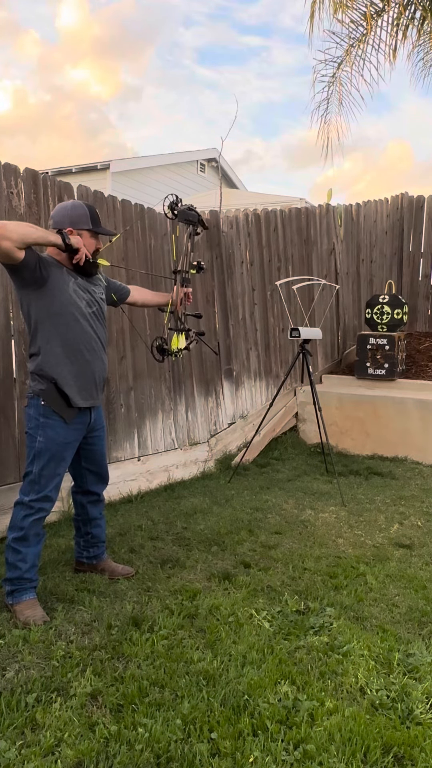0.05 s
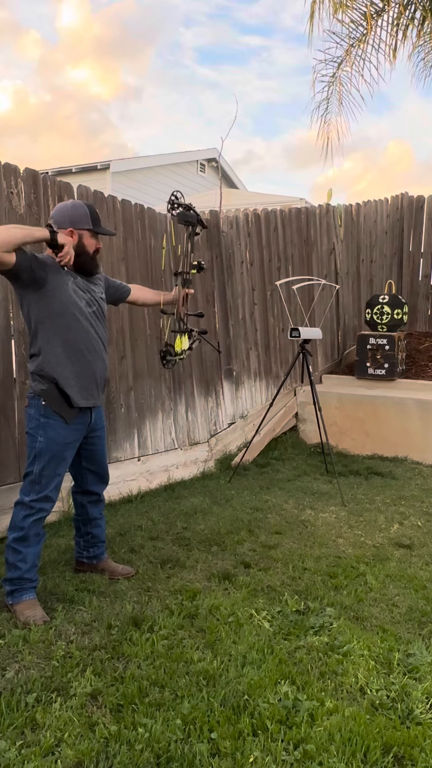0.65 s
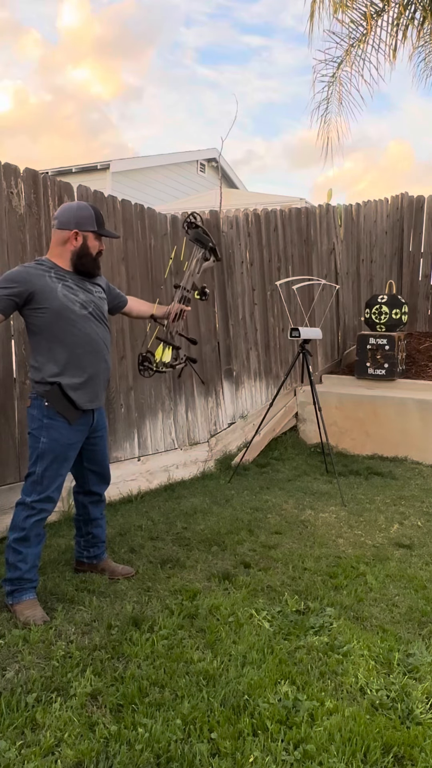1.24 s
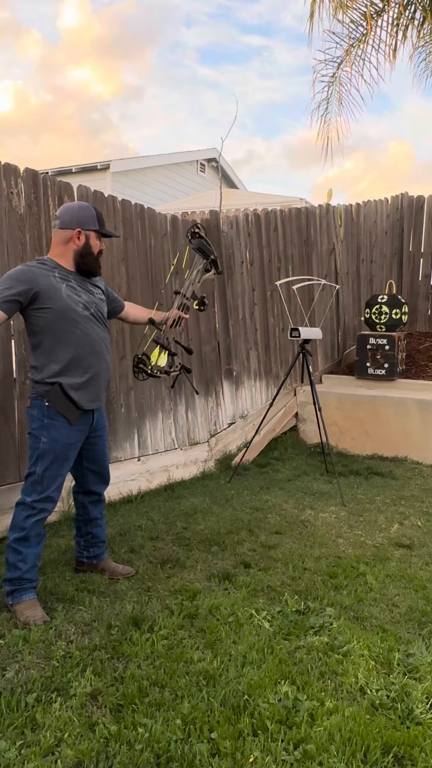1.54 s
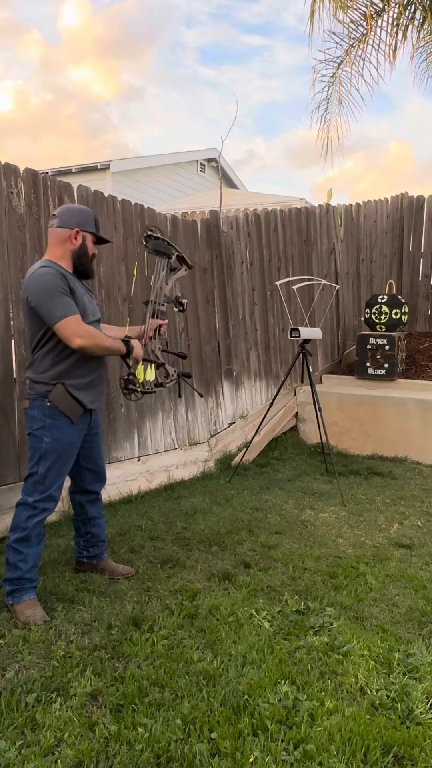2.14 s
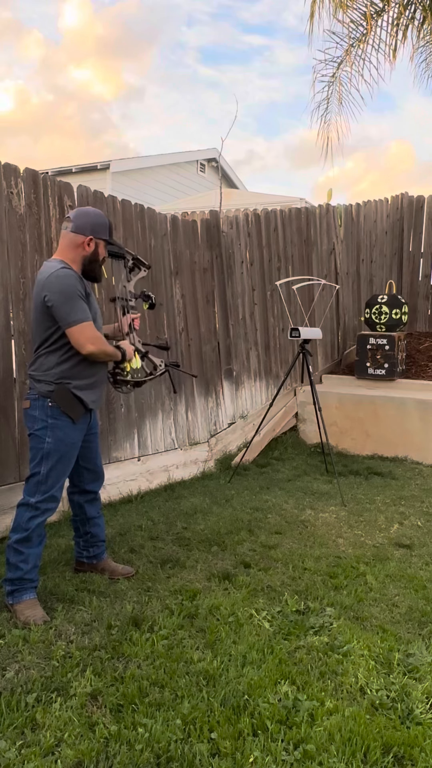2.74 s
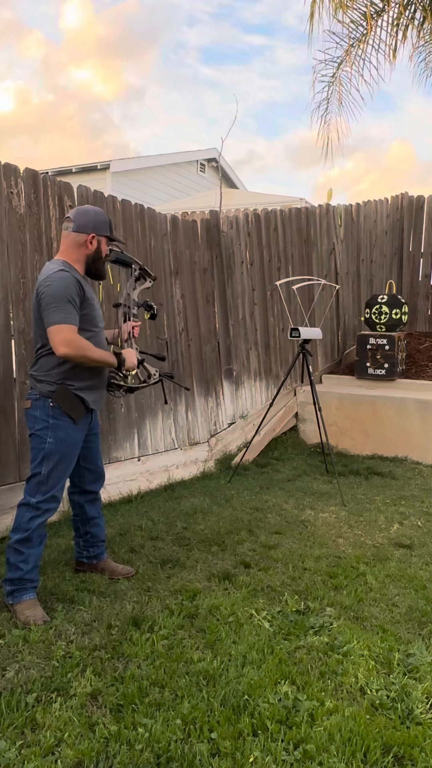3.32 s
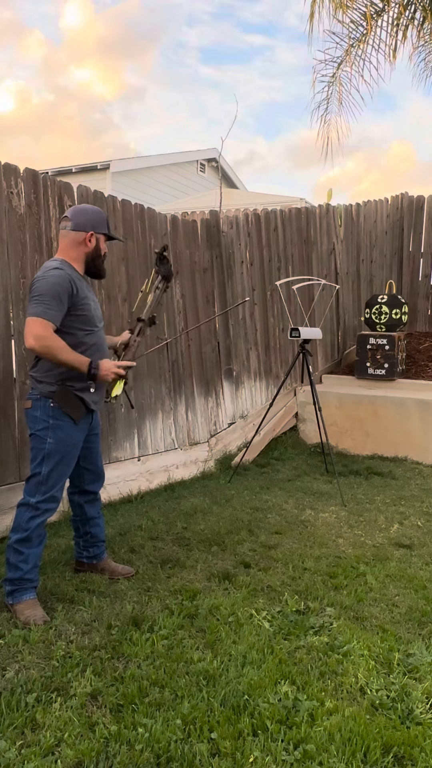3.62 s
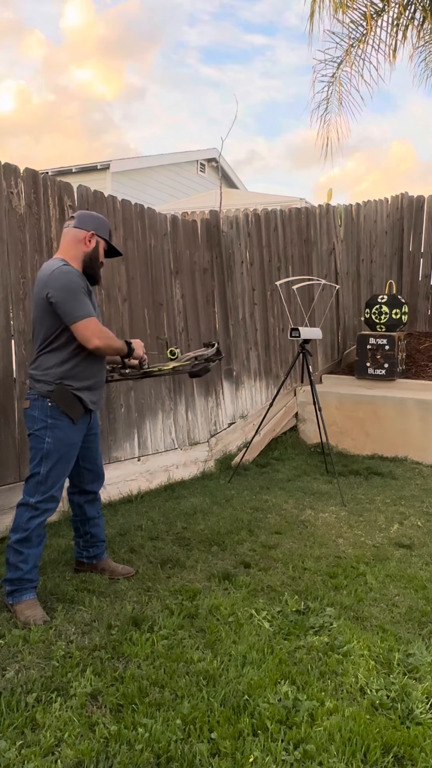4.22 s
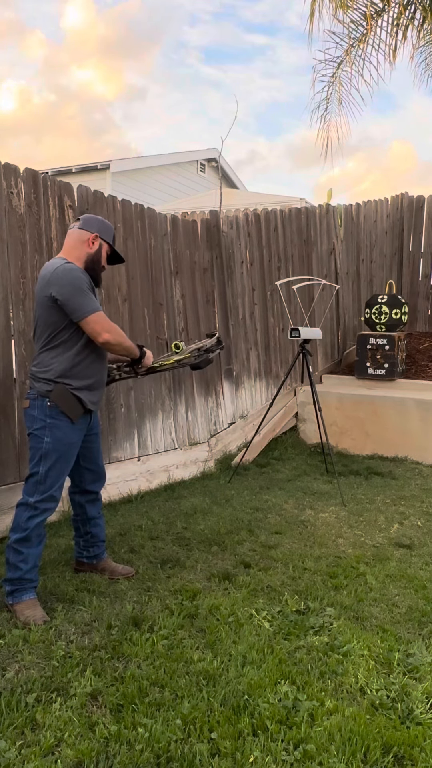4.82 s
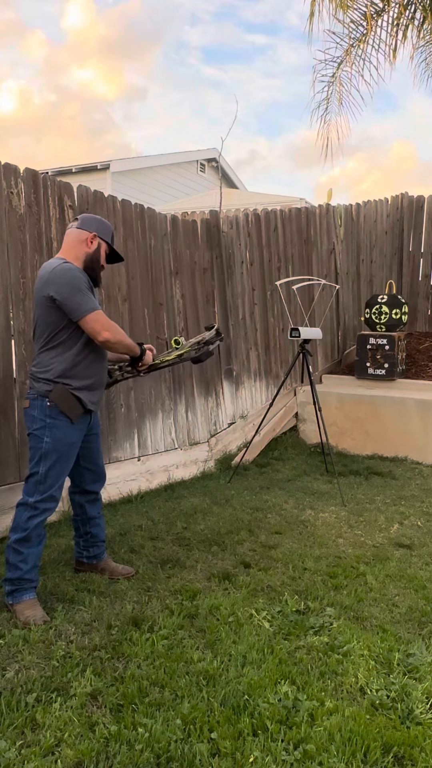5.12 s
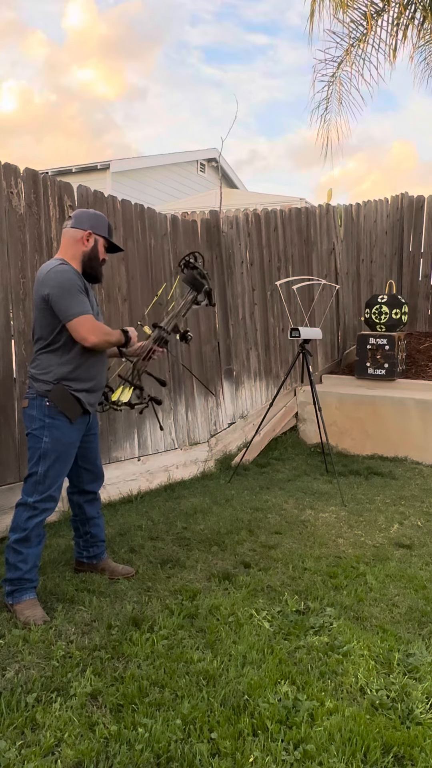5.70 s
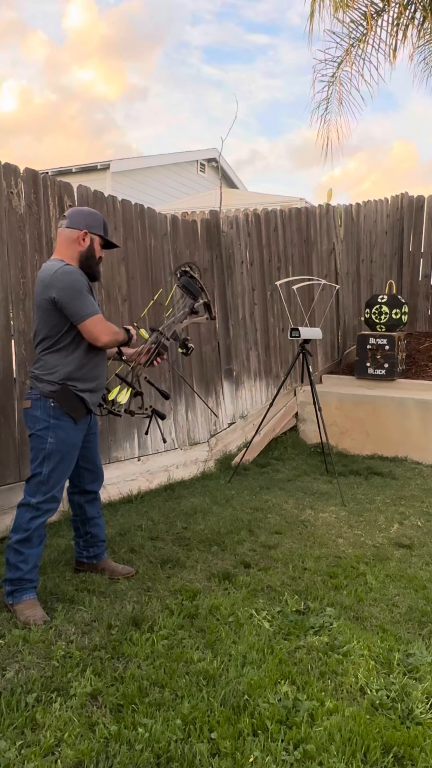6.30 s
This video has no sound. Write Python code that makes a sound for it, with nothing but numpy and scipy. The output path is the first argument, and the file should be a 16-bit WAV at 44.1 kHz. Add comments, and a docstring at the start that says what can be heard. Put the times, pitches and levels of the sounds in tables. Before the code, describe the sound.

In a quiet back yard, heard from a few steps away, a bowstring cracks and an arrow thuds into a target so quickly that they make nearly one sound, with a short fluttering echo. Afterwards the archer handles the bow and a fresh arrow with light taps, rubs and knocks, ending in a small snap onto the string. A faint distant rumble continues underneath.

```python
"""A bow shot in a back yard

A compound bow fires: the string cracks home and sets the frame ringing. Some 40 ms later the arrow
smacks into a target block, and the smack bounces between wooden fences. Then come small clicks and
rubs as the archer takes another arrow and snaps it onto the string. Behind it all is a quiet
neighbourhood rumble, with faint tones and one far-off yelp."""
import sys
import numpy as np
from scipy import signal
from scipy.fft import rfft, irfft, next_fast_len
from scipy.io import wavfile
from scipy.ndimage import map_coordinates

SR = 44100
rng = np.random.default_rng(int(sys.argv[2]) if len(sys.argv) > 2 else 0)


def put_to_file(sound):
    """Save the sound as 16-bit audio at rate SR, in the file named by the first command-line argument."""
    columns = np.atleast_2d(sound).T  # one column per channel
    safe = np.clip(columns, -1, 1)
    whole_steps = np.round(safe * 32767)
    wavfile.write(sys.argv[1], SR, whole_steps.astype(np.int16))


N = 288842


def amp(db):
    """Turn decibels into a gain."""
    return 10 ** (np.asarray(db) / 20)


def unit(x):
    """Scale a sound to an average (rms) level of 1."""
    return x / np.sqrt(np.mean(x ** 2) + 1e-20)


def along(points, hz):
    """Read between the rows of a (frequency, value) table, on a log axis."""
    f, v = np.transpose(points)
    return np.interp(np.log(hz + 1), np.log(f + 1), v)


def clock(size=SR // 2):
    """The time of each sample, in seconds."""
    return np.arange(size) / SR


def curves(rows):
    """Join the rows of a table over time: one curve for each column after the first."""
    s, *columns = np.transpose(rows)
    return [np.interp(clock(N), s, column) for column in columns]


def wobble(rate, size):
    """A smooth random curve through `rate` points a second."""
    points = rng.standard_normal(int(size * rate / SR) + 4)
    return map_coordinates(points, [np.arange(size) * rate / SR])


def fade(t, t60):
    """Die away by 60 dB in the fade time, t60 seconds."""
    return np.exp(-np.log(1000) * t / t60)


def struck(t, rise, t60):
    """The loudness of something hit: a quick rise, then a fade."""
    t = np.maximum(t, 0)
    return (1 - np.exp(-t / rise)) * fade(t, t60)


def swell(s, half, sound):
    """Fade a sound in and out around time s; return its start time and the sound."""
    t = clock(sound.shape[-1])
    start = max(s - t.mean(), 0)
    return start, sound * np.exp(-((start + t - s) / half) ** 2 / 2)


def add(track, s, sound):
    """Mix a sound into a track at time s."""
    start = round(s * SR)
    track[..., start:start + sound.shape[-1]] += sound[..., :N - start]


def filtered(x, response):
    """Turn each frequency up or down by response(frequency)."""
    size = next_fast_len(x.shape[-1] + 8192)
    hz = np.fft.rfftfreq(size, 1 / SR)
    return irfft(rfft(x, size) * response(hz), size)[..., :x.shape[-1]]


def colour(points):
    """A filter shape drawn through (frequency, level) points."""
    return lambda hz: amp(along(points, hz))


def resonance(centre, width, order=1):
    """A filter shape that keeps a band around one pitch; higher orders are steeper."""
    return lambda hz: (1j * hz * width / (centre ** 2 - hz ** 2 + 1j * hz * width)) ** order


def lowpass(top_hz, order=4):
    """A filter shape that takes away the highs."""
    return lambda hz: 1 / np.sqrt(1 + (hz / top_hz) ** (2 * order))


def noise(response, likeness, size=SR // 2):
    """Filtered stereo noise; likeness 1 makes left and right the same, 0 unrelated."""
    def mid_and_side(hz):
        turn = np.arccos(np.clip(along(likeness, hz), -1, 1)) / 2
        return response(hz) * np.array([np.cos(turn), np.sin(turn)])
    mid, side = filtered(rng.standard_normal((2, size)), mid_and_side)
    return unit(np.array([mid + side, mid - side]))


def gliding(hz, width_hz):
    """A band of noise whose centre slides along the curve hz."""
    centre = hz.mean()
    band = noise(resonance(centre, width_hz, order=3), AIR_LIKENESS, size=len(hz))
    shift = np.exp(2j * np.pi * np.cumsum(hz - centre) / SR)
    return np.real(signal.hilbert(band) * shift)


def ringing(tones, rise):
    """Fading (pitch, level, fade time) tones, each starting at a random point in its wave."""
    t = clock()
    return sum(amp(db) * struck(t, rise, t60) * np.sin(2 * np.pi * hz * t + rng.uniform(0, 2 * np.pi))
               for hz, db, t60 in tones)


def grainy(x, depth_db=4, rate=370):
    """Roughen a sound by shaking its level quickly."""
    return unit(x * amp(depth_db * wobble(rate, x.shape[-1])))


def panned(x, left_db):
    """Lean a sound to the left (+) or right (-)."""
    return x * amp([[left_db / 2], [-left_db / 2]])


def leaning(x, points):
    """Lean each frequency to its own side."""
    return filtered(x, lambda hz: amp(np.outer([.5, -.5], along(points, hz))))


# The tone of the rumble and hiss: (frequency [Hz], level [dB])
RUMBLE_COLOUR = [(12, -51), (20, -18.5), (88, 2), (120, -7), (158, -6.5), (216, -12.5), (301, -17.5),
                 (337, -17.5), (459, -21), (558, -21), (976, -26), (1370, -28.5), (1660, -31.5),
                 (4400, -39), (6000, -38.5), (8410, -44), (16000, -66)]
# The rumble eases slowly: (time [s], level [dB])
RUMBLE_LEVEL = [(0, -62.5), (1.3, -64), (2.4, -63), (4.4, -64), (5.4, -64.5), (6.55, -64.5)]
# A far-off wash of noise comes and goes: (time [s], level [dB], centre [Hz])
FAR_WASH = [(0, -69, 1199), (.19, -78.5, 1050), (.33, -70, 879.6), (.62, -74.5, 798.1), (1.5, -91.5, 650.7),
            (2.25, -72, 440), (3.0, -88, 599.1), (3.8, -74.5, 620.4), (4.4, -86, 649), (5.1, -78, 700),
            (6.55, -83, 848.6)]
# How alike far sounds are in both ears: (frequency [Hz], likeness [0-1])
AIR_LIKENESS = [(60, .89), (130, 0.84), (290, 0.85), (640, 0.055), (1400, 0.1), (3000, 0.004)]
# Which side the background favours: (frequency [Hz], left minus right [dB])
AIR_BALANCE = [(100, -2), (380, 1.5), (700, 0), (1300, 3), (2400, 6.5), (4400, 8), (8000, 2), (15000, 0)]
def neighbourhood(drift_db=0.52, wash_width_hz=650):
    """A low steady rumble with thin hiss, under a far-off wash and faint tones."""
    rumble_db, = curves(RUMBLE_LEVEL)
    wash_db, wash_hz = curves(FAR_WASH)
    rumble = amp(rumble_db + drift_db * wobble(1.8, N)) * noise(colour(RUMBLE_COLOUR), AIR_LIKENESS, N)
    wash = amp(wash_db) * gliding(wash_hz, wash_width_hz)
    return leaning(rumble + wash + far_tones(), AIR_BALANCE)


# Faint far-off tones: (middle time [s], half length [s], level [dB], pitch [Hz])
FAR_TONES = [(0.05, 0.1, -73.5, 1684), (.1, 0.14, -74, 281), (.56, 0.084, -65.5, 880),
             (.56, 0.038, -73.5, 439), (2.083, .17, -60.5, 174.6), (4.33, 0.094, -64, 138),
             (5.794, 0.2, -77.5, 573)]
def far_tones(width_at_1khz=55):
    """Distant tones swell and fade; the higher ones are more blurred on their way."""
    out = np.zeros((2, N))
    for s, half, db, hz in FAR_TONES:
        width = width_at_1khz * (hz / 1000) ** .75
        tone = noise(resonance(hz, width, order=2), AIR_LIKENESS, size=3 * SR // 2)
        add(out, *swell(s, half, amp(db) * tone))
    return out


# The release trips, the pulleys unwind, the arrow leaves, the string hits its stop and the
# bow's arms spring back: (time [s], level [dB], rise time [s], fade time [s])
STRING_CRACKS = [(0.629, -46, .0005, .07), (0.6381, -36.5, .0005, 0.11), (0.6477, -17, .0007, 0.062),
                 (.6530, -10.5, .0005, 0.029), (0.6583, -18.5, .0004, 0.058)]
# The tone of each crack: (frequency [Hz], level [dB])
CRACK_COLOUR = [(100, -19), (400, -2.5), (1500, 2), (2400, 0), (3200, -0.5), (4500, -5.5), (7000, 0),
                (9500, -3.5), (14500, -9), (16500, -15)]
# How alike close sounds are in both ears: (frequency [Hz], likeness [0-1])
CLOSE_LIKENESS = [(200, .6), (900, .3), (2500, 1), (8000, 0.011)]
def string_crack():
    """A swelling run of rough cracks as the string flies home."""
    out, t = np.zeros((2, N)), clock()
    for s, db, rise, t60 in STRING_CRACKS:
        roughness = amp(3.0 * wobble(1200, len(t)))
        crack = unit(roughness * noise(colour(CRACK_COLOUR), CLOSE_LIKENESS))
        add(out, s, amp(db) * struck(t, rise, t60) * crack)
    return panned(out, left_db=-2.0)


# The tones of the bow's arms, handle and pulleys: (pitch [Hz], level [dB], fade time [s])
BOW_TONES = [(94, -34.5, 0.23), (255, -18.5, .08), (301.2, -21, 0.06), (486.2, -27, 0.17), (565, -25, .1),
             (761, -25.5, .18), (932, -10, 0.038), (1076, -28, .16), (1089, -28.5, 0.27),
             (1193.5, -30, 0.15), (1438, -24.5, .18), (1529, -23, 0.23), (1618, -27, 0.29),
             (1756, -28, 0.13), (2064, -24.5, 0.18), (4000, -33.5, 0.17), (5980, -29, .09),
             (7492, -29.5, .09)]
def bow_ring(stop_time=.6518, rise=0.002):
    """The string's sudden stop sets the whole bow ringing."""
    out, t = np.zeros((2, N)), clock()
    for hz, db, t60 in BOW_TONES:
        # shorter waves reach the two microphones further out of step
        spread = np.array([[1], [-1]]) * 0.4 * min(hz / 1000, 2)
        phase = rng.uniform(0, 2 * np.pi) + spread
        # nearby echoes shift each side a little more, by chance
        phase += .45 * min(hz / 300, 1) * rng.standard_normal((2, 1))
        add(out, stop_time, amp(db) * struck(t, rise, t60) * np.sin(2 * np.pi * hz * t + phase))
    return panned(out, left_db=-0.5)


# The point breaks through the target's layers: (time [s], level [dB], push length [s])
PUNCHES = [(0.6923, -4, .0004), (.6939, -6.5, .0003), (0.6954, -4, .0004)]
def arrow_hit(tear_db=-12, tear_t60=.007, tear_hz=2800, top_hz=6000):
    """The arrow punches in with a few sharp pushes that tear the layers."""
    out, t = np.zeros((2, N)), clock()
    for s, db, length in PUNCHES:
        push = (t / length - 1) * np.exp(-t / length)
        tear = amp(tear_db) * fade(t, tear_t60) * noise(resonance(tear_hz, width=3500), YARD_LIKENESS)
        add(out, s, amp(db) * (push + tear))
    out = filtered(out, lowpass(top_hz, order=2))
    # the target stands to the right, so the left microphone hears it a little later
    delays = np.array([[.00005], [0]])
    out = filtered(out, lambda hz: np.exp(-2j * np.pi * hz * delays))
    return panned(out, left_db=-3.0)


# The tones of the target block and its stand: (pitch [Hz], level [dB], fade time [s], delay [s])
BLOCK_TONES = [(63, -30.5, 0.32, .012), (122, -25.5, .2, .014), (187.4, -30.5, 0.16, .005),
               (654.3, -11.5, .05, 0), (740, -19.5, .1, 0), (1614, -28.5, 0.061, 0.00097),
               (2750, -22, .025, 0)]
def block_thud(rise_cycles=0.21, thud_time=.6975, thud_db=-16, start_hz=280, end_hz=88, sag_s=0.014):
    """The struck block knocks, then thuds with a pitch that sags as it gives way."""
    out, t = np.zeros(N), clock()
    hit_time = PUNCHES[0][0]
    for hz, db, t60, delay in BLOCK_TONES:
        tone = struck(t, rise_cycles / hz, t60) * np.sin(2 * np.pi * hz * t)
        add(out, hit_time + delay, amp(db) * tone)
    pitch = end_hz + (start_hz - end_hz) * np.exp(-t / sag_s)
    thud = struck(t, rise=.006, t60=.085) * np.sin(2 * np.pi * np.cumsum(pitch) / SR)
    add(out, thud_time, amp(thud_db) * thud)
    return panned(out, left_db=-1.5)


# How long the yard's echo lasts: (frequency [Hz], fade time [s])
YARD_FADE = [(100, .42), (500, 0.47), (1000, 0.57), (1600, .6), (3000, .54), (7000, 0.42), (11000, .31),
             (16000, 0.42)]
# The tone of that echo: (frequency [Hz], level [dB])
ECHO_COLOUR = [(60, -1), (170, -1.5), (320, -5), (700, -10), (1000, -3), (1700, -1), (2400, -0.5),
               (3200, -2.5), (5000, -1), (8000, -4), (14000, -9.5)]
# How alike it is in both ears: (frequency [Hz], likeness [0-1])
YARD_LIKENESS = [(100, 0.98), (500, 0.97), (2000, 0.46), (8000, .35)]
# Which side it favours: (frequency [Hz], left minus right [dB])
YARD_BALANCE = [(150, -1.5), (700, 1.5), (2400, 2), (4400, 6), (8000, 5.5), (15000, 0)]
def yard_echo(x, onset_s=0.01, build_s=.01):
    """Sound scatters off boards, walls and house; each frequency dies at its own speed."""
    out = np.zeros((2, N))
    # the sound wanders between two sets of paths, which blurs its pitches
    blend = 1.5 * wobble(90, N)
    for share in (np.cos(blend), np.sin(blend)):
        hiss = noise(np.ones_like, YARD_LIKENESS, size=2 * SR // 3)
        hz, t, bands = signal.stft(hiss, SR, nperseg=256)
        _, tail = signal.istft(bands * fade(t, along(YARD_FADE, hz)[:, None]), SR, nperseg=256)
        since_onset = np.maximum(clock(tail.shape[1]) - onset_s, 0)
        tail *= 1 - np.exp(-since_onset / build_s)
        tail = filtered(tail / np.linalg.norm(tail[0]), colour(ECHO_COLOUR))
        tail = leaning(tail, YARD_BALANCE)
        out += signal.oaconvolve((share * x.mean(0))[None], tail, axes=1)[:, :N]
    return out


# What the fence boards throw back: (frequency [Hz], level [dB])
FENCE_COLOUR = [(100, -20), (700, -7.5), (1600, 4.5), (3500, 4.5), (8000, -2), (15000, -10)]
def fence_flutter(x, trip_s=.0514, first_db=-8.5, loss_db=6.5, every_second_db=-8.5):
    """Sound bounces between facing fences, fading each trip; every second echo is weaker still."""
    out, thrown = np.zeros(N), filtered(x.mean(0), colour(FENCE_COLOUR))
    for trip in range(7):
        db = first_db - loss_db * trip + every_second_db * (trip % 2)
        add(out, (trip + 1) * trip_s, amp(db) * thrown)
    return panned(out, left_db=1.5)


def house_echo(x, delay=.059, wall_db=-9, top_hz=220):
    """Bass passes through the boards and comes back from the house."""
    out = np.zeros((2, N))
    add(out, delay, amp(wall_db) * filtered(x, lowpass(top_hz, order=2)))
    return out


# The tone of two hard things touching: (frequency [Hz], level [dB])
TICK_COLOUR = [(300, -21), (1500, -1.5), (3500, -3), (6000, -0.5), (9000, 3.5), (16000, -7)]
def tick(t60, top_hz, rise=.00008):
    """The sharp noise of a touch; softer ones lose their highs."""
    hiss = noise(lambda hz: colour(TICK_COLOUR)(hz) * lowpass(top_hz)(hz), CLOSE_LIKENESS)
    return struck(clock(), rise, t60) * hiss


def held_ring(hz, width_hz, t60, rise=0.00025):
    """The blurred ring of a part held in the hand."""
    return struck(clock(), rise, t60) * noise(resonance(hz, width_hz, order=2), CLOSE_LIKENESS)


# Small hard parts of the release and arrow touch; the row at 5.193 s is the nearby fence throwing back the tap
# just before it: (time [s], level [dB], tick fade time [s])
LIGHT_TAPS = [(1.514, -71.5, .03), (2.041, -67.5, .012), (2.7220, -45, 0.099), (3.428, -63.5, .035),
              (3.481, -55.5, .02), (3.612, -56.5, .013), (3.66, -67, 0.039), (5.1818, -44.5, 0.013),
              (5.193, -56, 0.027), (5.366, -70, 0.045), (5.495, -71, 0.036)]
def taps(top_hz=17000, ring_hz=6300, ring_db=-8, ring_t60=0.039):
    """Light hard touches, each a bright tick and a thin ring."""
    out = np.zeros((2, N))
    for s, db, t60 in LIGHT_TAPS:
        tap = tick(t60, top_hz) + amp(ring_db) * held_ring(ring_hz, 0.23 * ring_hz, ring_t60)
        add(out, s, amp(db) * tap)
    return panned(out, left_db=-3.5)


# The tones in a short far-off yelp: (pitch [Hz], level [dB])
YELP_TONES = [(1020, -56), (1520, -72), (2050, -77), (3000, -78)]
def yelp(start=2.095, rise=0.0063, t60=0.32, width_hz=120):
    """One blurred yelp from another yard."""
    out, t = np.zeros((2, N)), clock()
    for hz, db in YELP_TONES:
        tone = noise(resonance(hz, width_hz, order=2), AIR_LIKENESS)
        add(out, start, amp(db) * struck(t, rise, t60) * tone)
    return out


# Arrow and hand knock against the bow; harder knocks have a higher top:
# (time [s], level [dB], pitch [Hz], top frequency [Hz])
BOW_KNOCKS = [(2.431, -58.5, 893, 3500), (2.7592, -55.5, 1700, 15000), (3.069, -70.5, 4003, 4490),
              (3.104, -59, 1540, 5104), (3.543, -60, 820, 5600), (4.3786, -50.5, 2150, 6500),
              (4.505, -66, 1747, 8300), (6.189, -65.5, 1450, 7300)]
# Every knock rings the arrow shaft: (pitch [Hz], level against the knock [dB], fade time [s])
SHAFT_TONES = [(1989, -6, .07), (3520, -9, .07), (5430, -5, .05)]
def knocks(width_hz=650, t60_at_1khz=.068, tick_db_per_octave=9.5, even_top_hz=4830):
    """Heavier bumps: a dull knock and the shaft's ring, with more tick the harder they are."""
    out = np.zeros((2, N))
    for s, db, hz, top_hz in BOW_KNOCKS:
        body = held_ring(hz, width_hz, t60_at_1khz * (1000 / hz) ** .3)  # higher pitches die sooner
        shaft = filtered(ringing(SHAFT_TONES, rise=0.0016), lowpass(top_hz))
        tick_db = tick_db_per_octave * np.log2(top_hz / even_top_hz)
        add(out, s, amp(db) * (body + shaft + amp(tick_db) * tick(t60=.042, top_hz=top_hz)))
    return panned(out, left_db=-3.0)


# The first echoes from the fence beside the archer: (delay [s], level [dB])
NEAR_ECHOES = [(.0045, -11.5), (0.0121, -5.5), (0.0122, -5)]
def beside_fence(x):
    """The nearest boards thicken a sound with a few quick echoes, left and right swapped."""
    out = x.copy()
    for delay, db in NEAR_ECHOES:
        add(out, delay, amp(db) * x[::-1])
    return out


def quiver_rub(start=2.93, length=.29, edge_s=0.024, db=-70.5, growth_db=5, from_hz=1250, to_hz=1950):
    """An arrow slides out of the quiver with a grainy rub that grows and climbs in pitch."""
    out, t = np.zeros((2, N)), clock()
    progress = np.minimum(t / length, 1)
    fade_in = np.minimum(t / edge_s, 1)
    fade_out = np.exp(-np.maximum(t - length, 0) / edge_s)
    rub = grainy(gliding(from_hz + (to_hz - from_hz) * progress, width_hz=1500))
    add(out, start, amp(db + growth_db * (progress - 1)) * fade_in * fade_out * rub)
    return panned(out, left_db=-8.5)


# Things brushing past: (middle time [s], half length [s], level [dB], centre [Hz])
SOFT_BRUSHES = [(3.222, .03, -71.5, 5940), (3.948, 0.041, -77.5, 5140), (5.749, .04, -80, 7300),
                (6.014, 0.02, -72, 2630)]
def brushes():
    """Sleeves and the arrow's fins brush past in soft swells of grainy noise."""
    out = np.zeros((2, N))
    for s, half, db, hz in SOFT_BRUSHES:
        rustle = grainy(noise(resonance(hz, width=1.64 * hz, order=2), CLOSE_LIKENESS))
        add(out, *swell(s, half, amp(db) * rustle))
    return panned(out, left_db=-8.5)


# The arrow snaps on, then settles: (time [s], level [dB])
NOCK_SNAPS = [(5.187, 1.5), (5.5, -7.5)]
# The tones of the string and pulleys: (pitch [Hz], level [dB], fade time [s])
STRING_TONES = [(558, -59, .15), (772, -64, .14), (1140, -65, 0.18), (1282, -61, 0.18), (2020, -67.5, 0.21)]
def nock():
    out = np.zeros((2, N))
    for s, db in NOCK_SNAPS:
        add(out, s, amp(db) * ringing(STRING_TONES, rise=0.0048))
    return out


def scene():
    """Bow, target and small clicks all sound into the same yard."""
    crack, ring, hit, thud = string_crack(), bow_ring(), arrow_hit(), block_thud()
    light, heavy = taps(), knocks() + quiver_rub() + brushes()
    handling = light + heavy
    direct = crack + ring + hit + thud + light + beside_fence(heavy)
    archer_echo = yard_echo(amp(-3) * crack + amp(-6) * ring + amp(-2) * handling)
    target_echo = yard_echo(amp(-3.5) * hit + amp(-9) * thud)
    bounces = fence_flutter(hit + amp(-10.5) * crack + amp(-7) * handling) + house_echo(thud)
    return direct + archer_echo + target_echo + bounces + neighbourhood() + yelp() + nock()


# How well the microphones pick up each frequency: (frequency [Hz], level [dB])
MIC_COLOUR = [(20, -20), (32, -8.5), (45, -1), (9700, -0.5), (10800, -11), (12000, -11), (13200, 0)]
def record(dry, top_hz=16200):
    """The small microphones lose the deep bass, dip in the treble and cut off the very top."""
    heard = filtered(dry, colour(MIC_COLOUR))
    return filtered(heard, lowpass(top_hz, order=120))


dry = scene()
out = record(dry)
put_to_file(out)
```